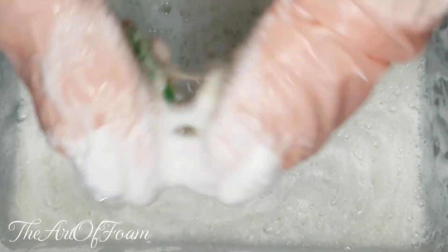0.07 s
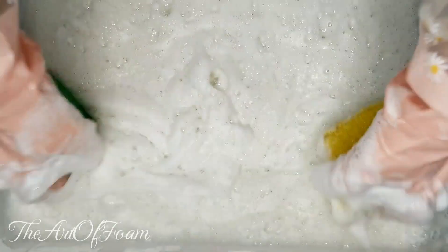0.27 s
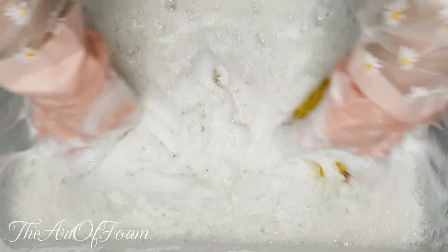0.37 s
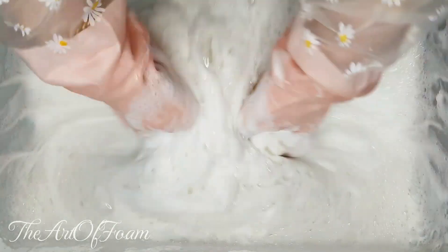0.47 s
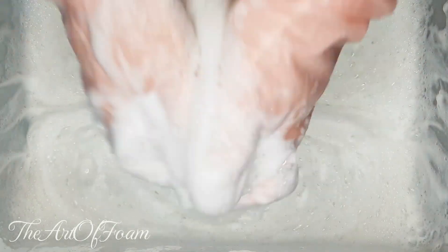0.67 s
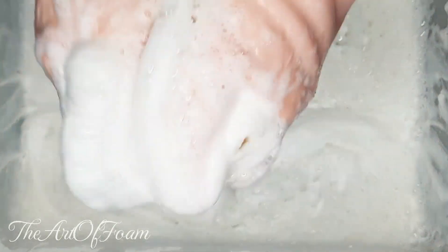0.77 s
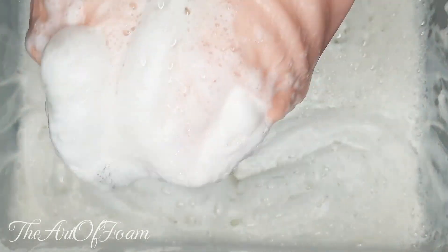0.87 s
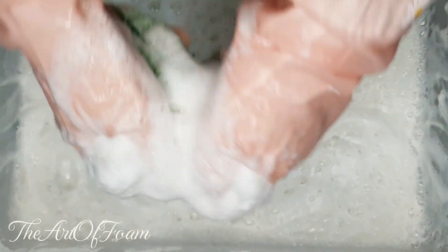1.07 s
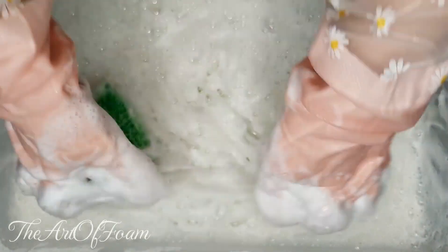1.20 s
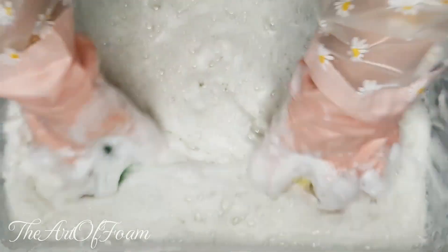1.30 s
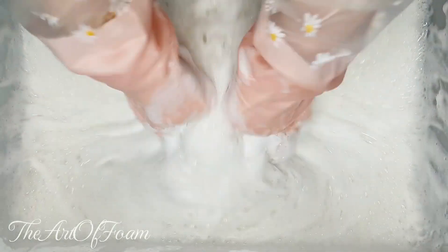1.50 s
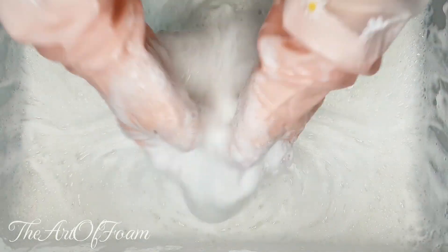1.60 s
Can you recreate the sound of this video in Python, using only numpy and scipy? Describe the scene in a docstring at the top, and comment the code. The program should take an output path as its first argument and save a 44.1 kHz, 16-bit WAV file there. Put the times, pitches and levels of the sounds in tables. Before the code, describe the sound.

Soaked sponges being squeezed close by, with bubbly squelches, crackling foam and soft glugs.

```python
"""Wringing soapy sponges

Gloved hands wring soaked sponges over a tray of soapy water, close to the microphone.
Each squeeze forces out a cloud of small ringing bubbles. Big air pockets gulp, foam crackles,
single bubbles pop, air spits from the pores and hollows in the hand ring. Two hand bumps and
a deep glug thump in the tray, and the water laps over a low room hum."""
import sys
import numpy as np
from scipy import signal
from scipy.fft import rfft, irfft
from scipy.io import wavfile
from scipy.ndimage import uniform_filter1d, minimum_filter1d

SR = 44100
rng = np.random.default_rng(int(sys.argv[2]) if len(sys.argv) > 2 else 0)


def unload_audio(sound):
    """Save the sound as a 16-bit wav file, at the path given as the first command line argument."""
    columns = np.transpose(np.atleast_2d(sound))
    # keep every value between -1 and 1, then stretch to whole-number steps
    steps = np.round(np.clip(columns, -1, 1) * 32767)
    wavfile.write(sys.argv[1], SR, steps.astype(np.int16))


N = 72765
T = np.arange(N) / SR

# The tone of the bubbly water. Each row: frequency in Hz, level in dB.
WATER_TONE = [(40, -34), (110, -15.5), (160, 2.5), (220, 5.5), (330, -8), (480, -8), (760, 0), (1050, -5),
              (1480, -3.5), (2050, -7), (2700, -8.5), (4000, -16.5), (7000, -22.5), (15000, -49)]
# Squeezes and gentler stirs. Each row: time of full flow in seconds, level in dB, seconds to rise
# by 20 dB, seconds to hold, seconds to fall by 20 dB, treble tilt in dB per octave.
SQUEEZE_STROKES = [(.003, -28, 0.11, 0.07, 0.061, -0.5), (0.136, -33.5, 0.035, 0.22, 0.048, -6.5),
                   (0.235, -23.5, 0.0045, 0.011, 0.056, -7), (0.724, -27, 0.12, 0.023, 0.041, -2.5),
                   (0.747, -21.5, 0.0082, 0.016, 0.065, -2), (0.767, -16, 0.028, 0.038, 0.054, 0.5),
                   (0.826, -32.5, 0.022, 0.037, 0.16, -3.5), (0.998, -32.5, 0.057, 0.026, 0.046, -4.5),
                   (1.043, -26, 0.039, 0.032, 0.05, -5), (1.19, -39, 0.083, 0.057, 0.036, 0.5),
                   (1.648, -28.5, 0.014, 0.0085, 0.079, -6.5)]


def squelch():
    """Soapy water and air are forced through the pores as a cloud of small bubbles."""
    cloud = bubbles(count=7000, low_hz=150, high_hz=14000, cycles=26, glide=.1, scatter_db=2.6)
    return presses(cloud, WATER_TONE, SQUEEZE_STROKES)


# Big pockets of air under the water. Each row: start in seconds, level in dB, pitch in Hz,
# seconds to fade by 60 dB.
AIR_POCKETS = [(.001, -9.5, 152, 0.032), (0.21, -17.5, 140, 0.12), (0.514, -23.5, 213, 0.075),
               (0.623, -25.5, 289, 0.097), (0.754, -9.5, 206, 0.026), (0.791, -20.5, 225, 0.31),
               (1.05, -26, 263, 0.11), (1.218, -17.5, 223, 0.052), (1.2525, -16, 490, 0.029),
               (1.517, -17.5, 152, 0.067)]


def glugs(swell_s=0.0016, rise_per_s=0.34):
    """Big bubbles swell quickly and ring low, rising a little in pitch."""
    out = np.zeros(N)
    for at, db, hz, t60 in AIR_POCKETS:
        age = np.maximum(T - at, 0)
        ring = np.sin(2 * np.pi * hz * age * (1 + rise_per_s * age))
        out += undb(db) * ring * np.minimum(age / swell_s, 1) * fade(age, t60)
    return out


# The tone of the foam. Each row: frequency in Hz, level in dB.
FOAM_TONE = [(500, -14), (1500, 5), (2800, 3), (5500, -4), (8000, -10), (15500, -21)]
# Foam being pressed or torn. Each row: the same six values as a squeeze, then the level of the
# crackle against the sizzle in dB.
FOAM_PRESSES = [(.01, -42.5, 0.11, 0.066, 0.093, 3.5, -23), (0.109, -34.5, 0.031, 0.12, 0.028, 1.5, -7.5),
                (0.268, -39.5, 0.07, 0.075, 0.06, 2.5, -7), (0.448, -46.5, 0.12, 0.15, 0.055, -1, -5),
                (0.744, -24, 0.0052, 0.038, 0.1, 0, 26), (0.826, -29, 0.034, 0.045, 0.015, -6.5, 8),
                (1.045, -41, 0.045, 0.1, 0.34, 1, -0.5), (1.477, -47, 0.16, 0.07, 0.055, 0.5, -7),
                (1.579, -42.5, 0.012, 0.015, 0.19, 1, -5)]


def foam():
    """Tiny soap films burst in a fine sizzle; under pressure larger ones crackle in it."""
    sizzle = bubbles(count=22000, low_hz=780, high_hz=15700, cycles=9, glide=.06, scatter_db=2)
    crackle = bubbles(count=3500, low_hz=900, high_hz=13000, cycles=6, glide=.06, scatter_db=3.2)
    return sum(presses(sizzle + undb(crackle_db) * crackle, FOAM_TONE, [press])
               for *press, crackle_db in FOAM_PRESSES)


# Single bubbles bursting. Each row: start in seconds, level in dB, pitch in Hz, seconds to fade # by 60 dB,
# level of the band-filtered snap against the ring in dB.
BURSTS = [(.0055, -15, 700, .012, -2), (.027, -24, 1700, .01, -3), (.054, -22, 1600, .008, 3),
          (.1225, -18, 900, .025, -2), (.123, -28, 5500, .009, 9), (.318, -25, 7000, .0028, 15),
          (.5155, -24, 1900, .014, 0), (.559, -39, 5500, .006, 7), (.7465, -13, 900, .014, 1),
          (.772, -15, 4500, .009, 2), (.785, -24, 7000, .008, 6), (.8245, -19, 2700, .012, 5),
          (.8435, -17, 3000, .01, 3), (.8592, -24, 3800, .011, 3), (.8668, -21, 2900, .011, 3),
          (.958, -24, 900, .012, -6), (1.2558, -33, 10000, .005, 7), (1.596, -29, 2500, .01, 3)]


def pops(longest_snap_s=0.024):
    """A bubble snaps and its cavity rings; smaller ones snap brighter."""
    out = np.zeros(N)
    for at, db, hz, t60, snap_db in BURSTS:
        age = T - at
        snap_hz = 1700 + 0.55 * hz
        noise = rng.standard_normal(N) * fade(age, min(longest_snap_s, t60))
        snap = resonate_twice(noise, snap_hz, width_hz=1.3 * snap_hz)
        ring = np.sin(2 * np.pi * hz * age) * fade(age, t60)
        out += undb(db) * (ring + undb(snap_db) * snap)
    return out


# The notes of the water-filled tray. Each row: pitch in Hz, level in dB, seconds to fade by 60 dB.
TRAY_NOTES = [(44.94, -13, 1), (64.3, -18.5, 0.69), (61, 4.5, 0.15), (89.3, 2.5, 0.12), (178, -13, 0.11),
              (213.7, -9.5, 0.21), (243, -2, 0.056), (319.5, -9, 0.13), (574, -5, 0.05)]
# Low thumps in the tray: two hand bumps, then a deep glug of water. Each row: start in seconds,
# strength in dB, change to the bass notes in dB, length of the push in seconds.
THUMPS = [(0.2332, 1, -1.5, 0.0026), (0.2677, -9.5, -3, 0.0021), (1.369, 2, -28, 0.0059)]


def tray_thumps(bass_below_hz=120):
    """Soft pushes set the full tray booming; a longer push weakens the higher notes."""
    out = np.zeros(N)
    for at, db, bass_db, push_s in THUMPS:
        age = T - at
        push = np.sin(np.pi / 2 * np.clip(age / push_s, 0, 1)) ** 2
        for hz, note_db, t60 in TRAY_NOTES:
            softening = np.hypot(1, (hz * push_s) ** 3)
            gain = undb(db + note_db + bass_db * (hz < bass_below_hz)) / softening
            out -= gain * push * np.cos(2 * np.pi * hz * (age - push_s / 2)) * fade(age, t60)
    return out


# Hollows between hand and sponge. Each row: start in seconds, length in seconds, level in dB,
# first pitch in Hz, last pitch in Hz.
HAND_HOLLOWS = [(0, .066, -30, 760, 790), (.002, .03, -35, 1560, 1520), (.036, .044, -28, 1660, 1580),
                (.768, .022, -21, 1500, 1250), (.79, .022, -20, 1350, 1650), (1.03, .035, -31, 1150, 1350)]


def hollows(width_hz=160):
    """Gushing water rings a hollow unevenly; the pitch slides as the hollow changes size."""
    out = np.zeros(N)
    for at, length, db, first_hz, last_hz in HAND_HOLLOWS:
        progress = (T - at) / length
        hz = first_hz + (last_hz - first_hz) * np.clip(progress, 0, 1)
        # Two slow noises make the tone waver in strength and pitch.
        gush = unit(soften(rng.standard_normal((2, N)), width_hz / 2))
        ring = (gush[0] + 1j * gush[1]) * np.exp(2j * np.pi * np.cumsum(hz) / SR)
        swell = np.exp(-(2 * progress - 1) ** 4)
        out += undb(db) * ring.real * swell
    return out


# Air spitting from a sponge. Each row: start in seconds, length in seconds, level in dB, low and
# high pitch in Hz, then the high ring and the spray against the low ring in dB, before softening.
AIR_SPURTS = [(1.2079, 0.013, -21.5, 920, 2220, -6, -14.5), (1.2532, 0.0058, -21, 860, 3800, -3.5, -4)]


def spurts(flutter_hz=700, ring_width_hz=300):
    """A wet film flutters in escaping air: uneven puffs ring the opening, with a little spray."""
    out = np.zeros(N)
    for at, length, db, low_hz, high_hz, high_db, spray_db in AIR_SPURTS:
        puffs = np.zeros(N)
        count = max(int(length * flutter_hz), 2)
        for k, (late, size) in enumerate(rng.random((32, 2))[:count]):
            puffs[int((at + (k + late) / count * length) * SR)] += .5 + size
        opening = np.exp(-((T - at) / length * 2 - 1) ** 6 / 2)
        low = unit(opening * resonate(puffs, low_hz, ring_width_hz))
        high = unit(opening * resonate(puffs, high_hz, ring_width_hz))
        spray = unit(opening * resonate_twice(rng.standard_normal(N), hz=1800, width_hz=2600))
        spit = unit(low + undb(high_db) * high + undb(spray_db) * spray)
        out += undb(db) * np.sqrt(length * SR / N) * spit
    return soften(out, above_hz=3700)


# The tone of the lapping water. Each row: frequency in Hz, level in dB.
LAPPING_TONE = [(40, -74), (100, 4.5), (180, -0.5), (270, 1.5), (380, -2.5), (600, -9.5), (850, -7.5),
                (1500, -17), (3000, -28.5), (8000, -55)]


def lapping(level_db=-36.5):
    """Bubbles in the stirred water keep gurgling softly."""
    cloud = bubbles(count=5000, low_hz=120, high_hz=7000, cycles=10, glide=.09, scatter_db=3.5)
    return undb(level_db) * unit(colour(cloud, LAPPING_TONE))


# The hum of the room. Each row: pitch in Hz, width of the band in Hz, level in dB.
HUM_BANDS = [(45.3, 21, -38), (139, 11, -40.5), (218.5, 15, -42.5)]
# The tone of the room's noise. Each row: frequency in Hz, level in dB.
ROOM_TONE = [(44, -41), (80, 1.5), (200, -20), (500, -7), (1500, -18.5), (4000, -35), (9000, -36),
             (16000, -38)]


def room(noise_db=-44.5):
    """Narrow bands of noise hum over a faint rumble and hiss."""
    hum = sum(undb(db) * unit(resonate_twice(rng.standard_normal(N), hz, width))
              for hz, width, db in HUM_BANDS)
    return hum + undb(noise_db) * unit(colour(rng.standard_normal(N), ROOM_TONE))


def bubbles(count, low_hz, high_hz, cycles, glide, scatter_db):
    """A steady cloud of bubbles, most of them quiet: each rings briefly and rises in pitch."""
    when, place, size, life = rng.random((count, 4)).T
    hz = (np.sqrt(low_hz) + place * (np.sqrt(high_hz) - np.sqrt(low_hz))) ** 2
    t60 = cycles * (.5 + life) / hz
    gain = undb(-scatter_db * np.log(np.maximum(size, np.exp(-4)))) * hz ** .75
    length = (t60 * SR).astype(int) + 2
    # Lay the rings end to end: k says which bubble, step counts the samples within it.
    k = np.repeat(np.arange(count), length)
    step = np.arange(len(k)) - (np.cumsum(length) - length)[k]
    age = step / SR
    phase = 2 * np.pi * hz[k] * age * (1 + glide * age / t60[k] / 2)
    ring = gain[k] * np.sin(phase) * fade(age, t60[k])
    position = ((when * N).astype(int)[k] + step) % N
    return unit(np.bincount(position, ring, N))


def presses(cloud, tone, table):
    """With each press the bubbling swells, holds and dies away, with its own brightness."""
    out = np.zeros(N)
    for at, db, rise, hold, fall, tilt in table:
        drop_db = 20 * (np.maximum(at - T, 0) / rise + np.maximum(T - at - hold, 0) / fall)
        shifted = np.roll(cloud, rng.integers(N))
        out += undb(db - drop_db) * unit(colour(shifted, tone, tilt))
    return out


def colour(x, tone, tilt_db=0):
    """Shape a sound with a tone table, adding tilt_db for each octave above 1000 Hz."""
    size = 2 * N
    octave = np.log2(np.maximum(np.fft.rfftfreq(size, 1 / SR), 1))
    hz, db = np.array(tone, float).T
    above = np.maximum(octave - np.log2(1000), 0)
    gain = undb(np.interp(octave, np.log2(hz), db) + tilt_db * above)
    # This folding makes the filter ring only after a sound, never before it.
    cepstrum = irfft(np.log(gain))
    cepstrum[1:N] *= 2
    cepstrum[N + 1:] = 0
    return irfft(rfft(x, size) * np.exp(rfft(cepstrum)))[:N]


def resonate(x, hz, width_hz):
    """Keep a band of sound around one pitch."""
    return signal.lfilter(*signal.iirpeak(hz, hz / min(width_hz, SR / 4), fs=SR), x)


def resonate_twice(x, hz, width_hz):
    """Keep a band with steeper sides."""
    return resonate(resonate(x, hz, width_hz), hz, width_hz)


def soften(x, above_hz):
    """Turn down the higher frequencies."""
    return signal.sosfilt(signal.butter(2, above_hz, fs=SR, output="sos"), x)


def fade(age, t60):
    """Start at age 0 and die away by 60 dB every t60 seconds."""
    return (age >= 0) * np.exp(-np.log(1000) * np.maximum(age, 0) / t60)


def undb(db):
    """Turn decibels into a multiplier."""
    return 10 ** (np.asarray(db) / 20)


def unit(x):
    """Scale to an average power of 1."""
    return x / np.sqrt(np.mean(x ** 2) + 1e-18)


def scene():
    """All sources at one close microphone."""
    mix = squelch() + hollows() + foam() + spurts() + pops() + glugs() + tray_thumps()
    return (mix + lapping() + room())[None]


def record(dry, rumble_hz=24, top_hz=15900):
    """Drop the deepest rumble, hold down the loudest peaks and cut the highest treble."""
    sound = signal.sosfilt(signal.butter(2, rumble_hz, "high", fs=SR, output="sos"), dry)
    safe_gain = 1 / np.maximum(np.abs(sound), 1)
    smooth_gain = uniform_filter1d(minimum_filter1d(safe_gain, size=64), size=64)
    return signal.sosfilt(signal.ellip(10, .2, 80, top_hz, fs=SR, output="sos"), smooth_gain * sound)


dry = scene()
out = record(dry)
unload_audio(out)
```